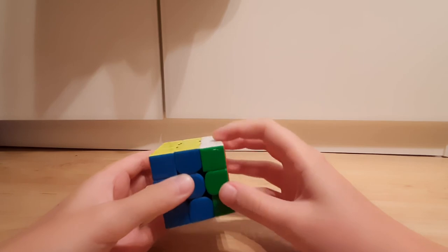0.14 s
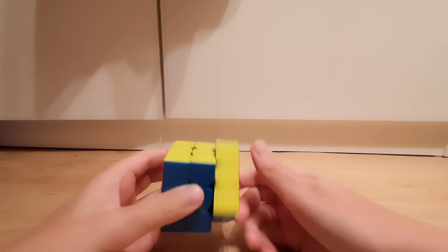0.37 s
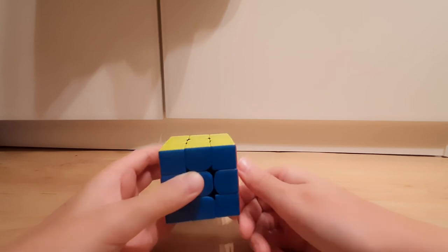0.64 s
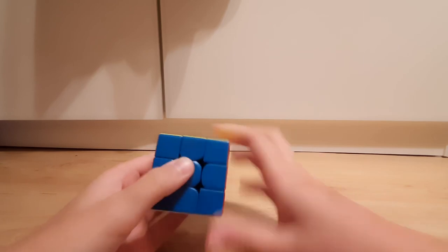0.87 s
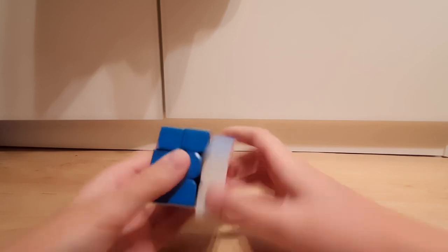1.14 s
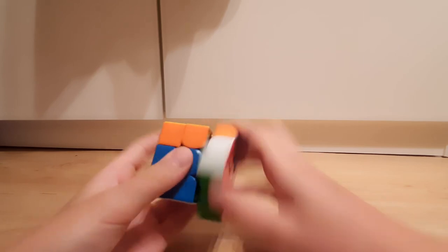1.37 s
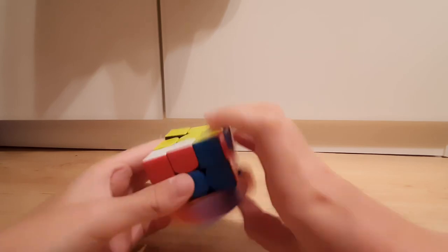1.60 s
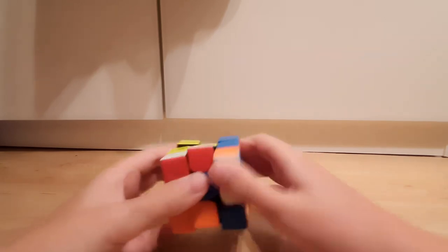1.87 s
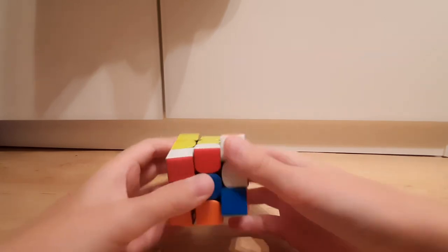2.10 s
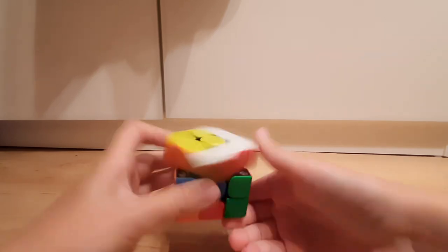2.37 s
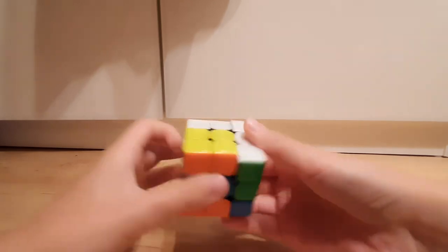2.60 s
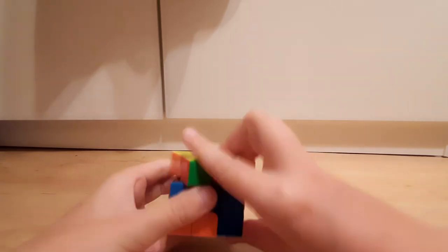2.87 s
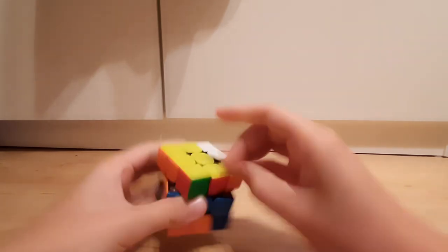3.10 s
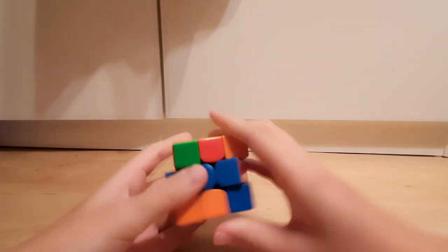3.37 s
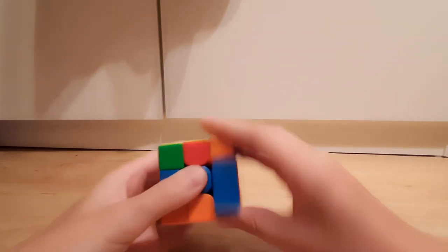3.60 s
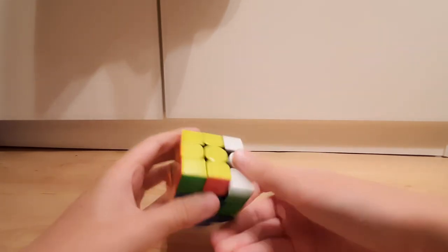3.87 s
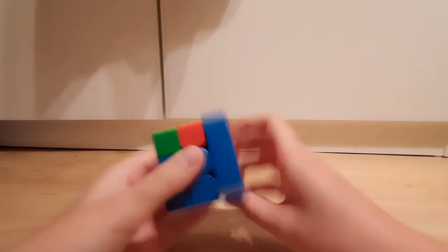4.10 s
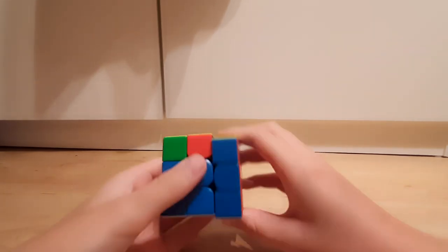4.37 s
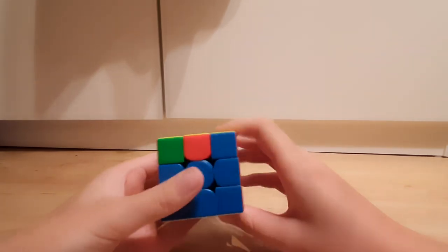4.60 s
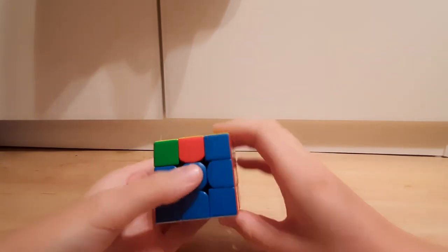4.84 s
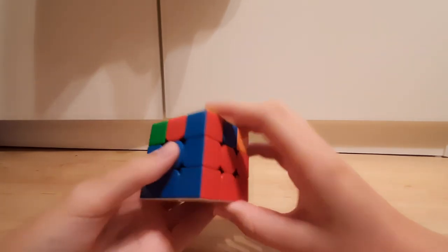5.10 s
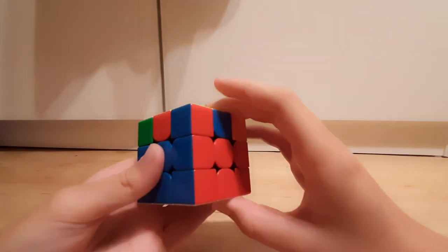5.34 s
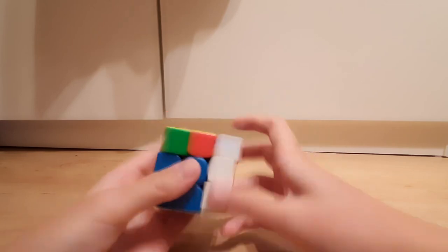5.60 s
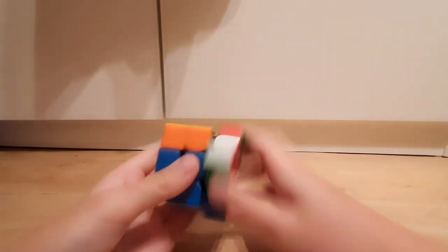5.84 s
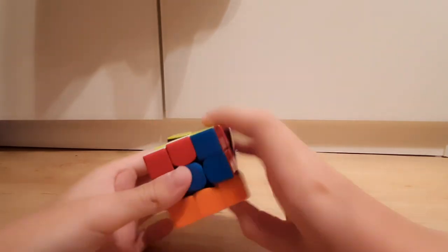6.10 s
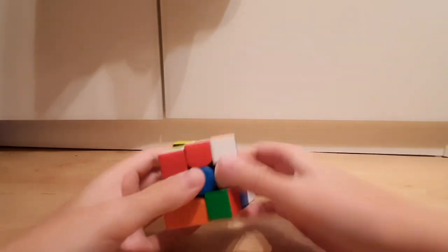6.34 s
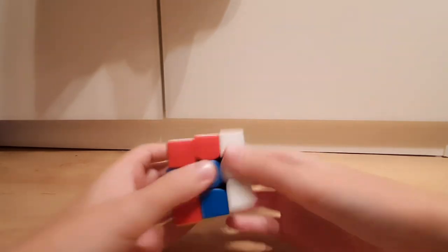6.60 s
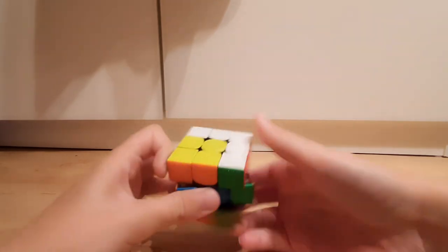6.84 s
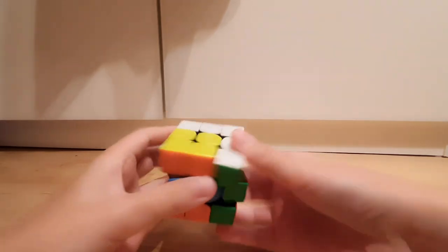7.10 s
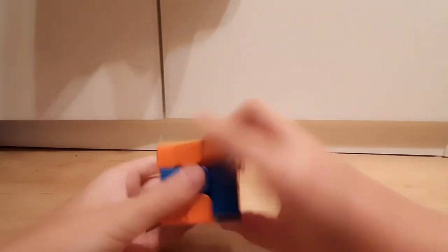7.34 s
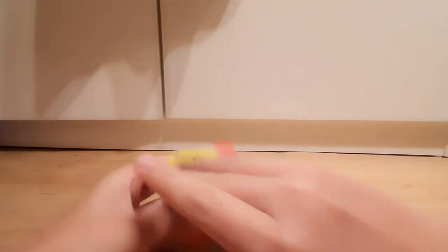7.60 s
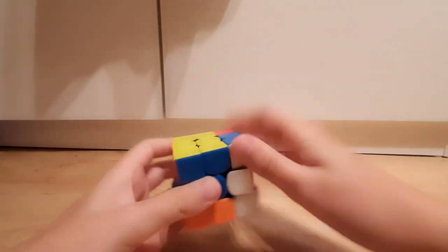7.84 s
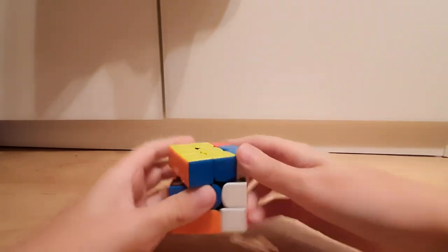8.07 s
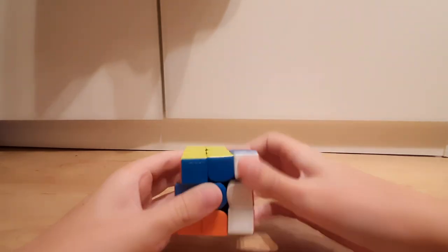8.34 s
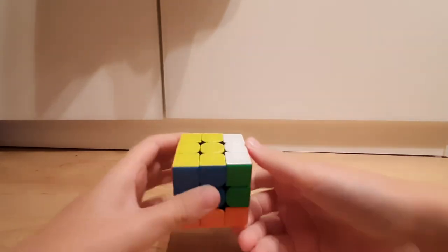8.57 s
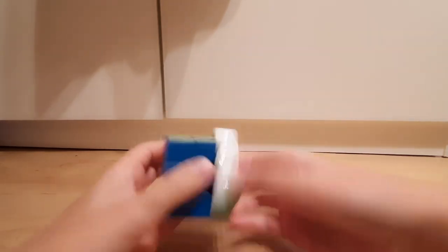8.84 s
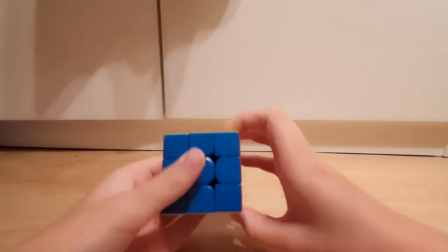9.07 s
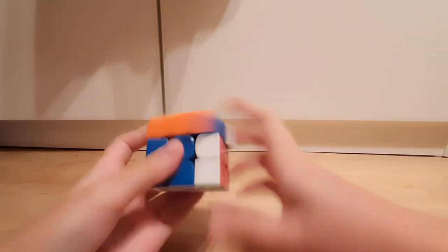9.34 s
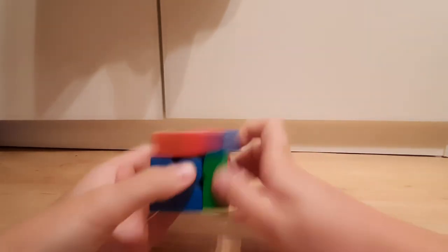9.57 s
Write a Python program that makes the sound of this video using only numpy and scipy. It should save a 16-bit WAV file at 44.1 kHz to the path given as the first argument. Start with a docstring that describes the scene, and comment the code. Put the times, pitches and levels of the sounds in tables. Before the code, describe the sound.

A small quiet room, miked closely in stereo, with soft hush, low traffic murmur and a faint engine droning through the walls, its pitch rising over the first four seconds. From 0 to 1 s a plastic puzzle cube gives small, soft clicks and a light slide. Around 1.1 s sharp snaps start, and from 1.4 to 3.1 s layers turn in rapid clattering bursts, bright and cracking with short hollow knocks and dry scraping. From 3.2 to 4.2 s the clicks are lighter, with a sharper snap at 3.9. From 4.3 to 5.5 s almost nothing but tiny ticks, while the engine returns, lower and falling. At 5.6 s the turning resumes, loudest around 6.1 s, rattling on until 7.8. Quieter clicks follow, a crisp snap at 8.4, gentle turns near 8.9, a brief lull, then hard quick turns at 9.3 and 9.6. Soft low bumps accompany the handling.

```python
"""Room hush, a murmur of traffic and a distant engine droning through the walls come first. At once
a plastic puzzle cube is turned by hand close to a pair of microphones in a small quiet room.
Bursts of tiny impacts snap and rattle its pieces, and dense ticks scrape its layers round.
The hands shake the table with low noise and bump it with short low cycles.
The engine is sines on a gliding firing tone; hush and traffic are coloured noise."""
import sys
import numpy as np
from scipy import signal
from scipy.fft import rfft, irfft
from scipy.io import wavfile
from scipy.ndimage import uniform_filter1d

SR = 44100
rng = np.random.default_rng(int(sys.argv[2]) if len(sys.argv) > 2 else 0)


def transcribe(u):
    """Save the signal u as a 16-bit wav file named by the first command-line argument.

    u: samples, shape (n,) or (channels, n), limited to [-1, 1]; the rate is SR.
    q: integer samples, one column per channel.
    """
    v = np.clip(np.atleast_2d(u).T, -1, 1)
    q = np.round(v * 32767).astype(np.int16)
    wavfile.write(sys.argv[1], SR, q)


def gain_from_db(level_db):
    """Turn a decibel level (scalar or array-like) into a linear amplitude factor."""
    decades = np.asarray(level_db, float) / 20
    return 10 ** decades


N = 427769

SIZE = 4096  # samples of one snap or filter response
APART = .62  # share of the crack that each microphone hears from another face of the cube


def evened(x):
    """Scales to rms 1."""
    return x / np.sqrt(np.mean(x ** 2) + 1e-20)


def read(points, hz):
    """Reads a spectrum on a log-frequency axis."""
    f, value = np.transpose(points)
    return np.interp(np.log(hz + 1), np.log(f + 1), value)


def add(mix, s, sound):
    """Mixes a sound in at s seconds."""
    part = mix[..., round(s * SR):][..., :sound.shape[-1]]
    part += sound[..., :part.shape[-1]]


def causal(db):
    """Minimum-phase spectrum from dB gains on the half circle."""
    log = np.log(gain_from_db(np.concatenate([db, db[..., -2:0:-1]], -1)))
    return np.exp(np.conj(signal.hilbert(log)))[..., :db.shape[-1]]


def noise(points, channels):
    """Steady noise of a given colour, rms 1."""
    z = rfft(rng.standard_normal((channels, N)))
    colour = gain_from_db(read(points, np.fft.rfftfreq(N, 1 / SR)))
    return evened(irfft(z * colour, N))


def background():
    """Steady hush, and a traffic rumble that both microphones share for the most part."""
    # colour of room tone and microphone hiss [f/Hz, relative level per Hz/dB]
    hush_colour = [(18, -58), (30, -8.5), (112, -5), (298, -16), (533, -16.5), (2000, -20), (2600, -23.5),
                   (7470, -25.5), (8530, -43.5), (11000, -22), (15500, -14), (16500, -38.5)]
    hush_db = -77.5
    # low murmur of traffic: the part shared by both microphones [t/s, level/dB]
    traffic_murmur = [(0, -78), (1.499, -79), (3, -64), (4.201, -77.5), (4.699, -83), (5.198, -72),
                      (6.5, -64.5), (8, -88.5), (9.1, -75), (9.7, -66)]
    s, db = np.transpose(traffic_murmur)
    rumble_colour = [(25, -9.5), (60, -1.5), (130, 5.5), (250, -10), (350, -13.5), (700, -49.5)]
    left, right, both = noise(rumble_colour, channels=3)
    rumble = both + .45 * np.array([left, right])
    rumble_gain = gain_from_db(np.interp(np.arange(N) / SR, s, db))
    return gain_from_db(hush_db) * noise(hush_colour, channels=2) + rumble_gain * rumble


def engine():
    """A firing tone, its octave and two shaft orders follow the engine speed, each fluttering unevenly."""
    # one path of the firing tone for each time the engine pulls [t/s, f/Hz, level/dB]
    pulls = [
        [(0, 108.2, -70.5), (.6, 112.2, -70.5), (1.45, 124.7, -60.5), (1.85, 127.2, -58), (2, 127.9, -96)],
        [(2.2, 133.7, -93), (2.5, 138.8, -74.5), (3.3, 153.8, -71), (3.7, 161, -66.5), (4.1, 160.6, -67.5),
         (4.4, 166, -83)],
        [(4.9, 112.9, -86.5), (5.25, 118.5, -55), (5.5, 114.3, -60.5), (5.85, 110.4, -57), (6.02, 107, -68)],
        [(6, 95.2, -70), (6.12, 93.8, -57.5), (6.5, 90.6, -60.5), (6.9, 92.2, -56.5), (7.2, 84.5, -69.5)],
    ]
    # one row for each pull: tones at 5/8, 1, 7/5 and 2 times the firing tone, against its path
    # [level/dB, level/dB, level/dB, level/dB]
    order_levels = [(-9.5, 0, -19.5, -16.5), (3, 0.007, -6, -22.5), (-10, 0, -28, -13.5),
                    (-13, 0.0044, -9.5, -8.5)]
    out = np.zeros(N)
    for rows, orders_db in zip(pulls, order_levels):
        s, *columns = np.transpose(rows)
        t = np.arange(s[0], s[-1], 1 / SR)
        hz, pull_db = (np.interp(t, s, c) for c in columns)
        turns = np.cumsum(hz) / SR
        for order, db in zip((5 / 8, 1, 7 / 5, 2), orders_db):
            drift = uniform_filter1d(rng.standard_normal((2, len(t))), size=1500)
            level, phase = evened(uniform_filter1d(drift, size=1500))
            gain = np.sqrt(2) * gain_from_db(pull_db + db + 3.3 * level)
            add(out, s[0], gain * np.sin(2 * np.pi * order * turns + 0.43 * phase))
    return out


def ring(count, vary_db, detune):
    """Spectra of the body modes and of the crack, struck at another spot each time."""
    # hollow pieces ring briefly, before each strike varies them [f/Hz, level/dB, t60/s]
    body_modes = [(351, -3.5, 0.014), (600, -19.5, 0.0082), (825, -7, 0.02), (906, 2.5, 0.0096),
                  (1275, 3, 0.023), (1557, 2.5, 0.02), (1856, -2, 0.024), (2065, 0.5, 0.017)]
    # colour of the crack as the microphones hear it, before each strike varies it [f/Hz, level/dB]
    crack_colour = [(150, -52), (600, -18.5), (2200, -6.5), (3700, -4.5), (7500, 0), (8200, -7),
                    (8900, -17), (10200, -10.5), (11500, -8), (15600, -13.5), (16200, -57)]
    longest_s = .025  # upper limit on the t60 of the damped plastic
    t, hz = np.arange(SIZE) / SR, np.fft.rfftfreq(SIZE, 1 / SR)
    f, db, t60 = (c[:, None] for c in np.transpose(body_modes))
    spot = rng.standard_normal((count, 2, len(body_modes), 1))
    fade_db = -60 * t / np.minimum(t60, longest_s)
    tones = np.sin(2 * np.pi * f * (1 + detune * spot[:, 1]) * t)
    modes = gain_from_db(db + vary_db * spot[:, 0] + fade_db) * tones
    # small pieces radiate no bass
    small = causal(read([(100, -33.5), (350, -22.5), (480, -19.5), (620, -8.0)], hz))
    lumps = uniform_filter1d(rng.standard_normal((count, len(hz))), size=250, axis=1)
    crack = causal(read(crack_colour, hz) + vary_db * evened(lumps))
    return rfft(modes.sum(1)) * small, crack


def peaked(x):
    """Scales each sound so that its loudest moment, smoothed over 70 samples, has amplitude 1."""
    power = uniform_filter1d((x ** 2).mean(1), size=70, axis=-1)
    return x / np.sqrt(2 * power.max(-1))[:, None, None]


def snaps():
    """Each snap is a rattle of tiny impacts that builds, peaks and dies; it cracks and rings the hollow pieces."""
    # pieces snapping into place, close up: moment the impacts peak, crack, hollow body against
    # crack, nominal half length ahead of the limits and unequal flanks
    # [t/s, level/dB, level/dB, half length/ms]
    snap_moments = [(0.0785, -46, -33, 0.75), (0.1329, -47, -30, 1.5), (0.1851, -38, -42, 2.1),
                    (0.2631, -41.5, -4, 6.2), (0.3223, -34.5, 1.5, 2.1), (0.3418, -35, 3, 1.4),
                    (0.3653, -35.5, -3.5, 2.9), (0.3771, -29.5, -7, 1.4), (0.4236, -41, 1, 6.83),
                    (0.5129, -52, -1, 5.2), (0.7106, -40, -8.5, 1.8), (0.9241, -44.5, -34, 1.6),
                    (0.9662, -29.5, -31, 1.1), (1.01, -47, -24, 1.6), (1.0915, -38, -25, 2.68),
                    (1.1312, -27, -8.5, 2.3), (1.149, -25, -15, 1.4), (1.1876, -18.5, -12.5, 3.6),
                    (1.2012, -19, -15, 1.2), (1.3374, -38.5, -2.5, 1.8), (1.3811, -28.5, -1, 1.5),
                    (1.4242, -13.5, -7, 1.9), (1.4366, -26, -9.5, 1.8), (1.4829, -21, -3.5, 7.2),
                    (1.5057, -19.5, -6.5, 5.9), (1.542, -16.5, -6, 3.6), (1.5648, -15, -6.5, 6.6),
                    (1.5861, -23, -4, 4.0), (1.6305, -9, -8.5, 3.1), (1.6556, -14, -8.5, 5.0),
                    (1.7584, -27, -7.5, 3.3), (1.7674, -18, -7, 1.7), (1.7846, -19.5, -7.5, 16),
                    (1.7952, -22, -3.5, 13), (1.8901, -31.5, -24.5, 0.84), (1.9448, -26, -2, 6.1),
                    (2.0039, -15, -5.5, 2.8), (2.1656, -10.5, -10, 2.6), (2.1785, -19.5, -4.5, 4.3),
                    (2.198, -21.5, -24, 4.2), (2.2969, -26, -6.5, 6.2), (2.3831, -24.5, -5.5, 9.6),
                    (2.4037, -19.5, -4, 3.5), (2.4165, -14.5, -11.5, 3.6), (2.4742, -29.5, 0.5, 2.0),
                    (2.5251, -30.5, -0.5, 2.9), (2.6002, -37, -1.5, 0.84), (2.6634, -39, -3, 3.3),
                    (2.7284, -29, -15.5, 1.5), (2.7474, -30.5, -13.5, 6), (2.7743, -17.5, -11, 3),
                    (2.7917, -23, -1.5, 5.7), (2.8184, -29, -10, 8.4), (2.8422, -20, -3.5, 1.2),
                    (2.8611, -22, -7.5, 4.4), (2.9609, -27.5, -35.5, 1.2), (3.0159, -10, -14, 0.52),
                    (3.0852, -16.5, -4, 1.3), (3.0937, -14.5, -10, 1.2), (3.1524, -28.5, -4, 2.56),
                    (3.2164, -30.5, -24, 2.81), (3.2348, -34.5, 0, 3.1), (3.3219, -35.5, -25, 0.88),
                    (3.3895, -38.5, -9, 3.2), (3.5001, -40, -2.5, 1.2), (3.5235, -37.5, -16.5, 3.8),
                    (3.6447, -37.1, -6, 2), (3.6706, -33.5, -3.5, 7.7), (3.6954, -23, -4, 2.1),
                    (3.7103, -28.5, -2, 1.4), (3.7257, -27.5, -23, 2.3), (3.8067, -37, 0, 3.8),
                    (3.8541, -28.5, -1, 1.7), (3.8836, -33, 4, 0.78), (3.8999, -25, -4, 1.5),
                    (3.9138, -14.5, -16.5, 1.6), (3.9998, -33.5, -3.5, 1.6), (4.0696, -31.5, -8.5, 2.1),
                    (4.1563, -30, -2.5, 2.7), (4.2774, -45.5, -13.5, 1.9), (4.3753, -58, -19, 1.4),
                    (4.4076, -52, -13, 2.6), (4.5124, -60.5, -24, 2.5), (4.8275, -61.5, -10, 2),
                    (4.9522, -48.5, -1, 0.33), (5.049, -62.5, -7.5, 1.5), (5.1502, -59.5, -17, 2.0),
                    (5.2334, -53, -28, 1), (5.2726, -47, -41, 0.68), (5.4355, -67.5, -3, 3.5),
                    (5.5618, -36.5, -5, 3.7), (5.5892, -25.5, -10, 1.5), (5.643, -18.5, -8.5, 6.3),
                    (5.661, -19.5, -10, 0.51), (5.7373, -28, -3.5, 1.6), (5.7803, -33, 0.5, 0.61),
                    (5.8326, -25, -5, 2.4), (5.8809, -16, -7, 5.2), (5.9539, -26.5, -42, 3.6),
                    (5.9746, -19, -6.5, 5.6), (6.0057, -18.5, -2, 3.7), (6.0231, -17.5, -7.5, 3.2),
                    (6.0435, -14.5, -6, 5.5), (6.0847, -11, -6.5, 3.4), (6.1118, -7.5, -9, 4.6),
                    (6.1439, -25, -5, 2.5), (6.1926, -22, -2, 6.5), (6.2042, -11, -16, 2.5),
                    (6.2243, -13, -8.5, 3.6), (6.3652, -37, -3.5, 2.67), (6.4384, -16, -7.5, 2.07),
                    (6.4878, -35.5, -5, 4.8), (6.5513, -28, -39, 0.53), (6.5759, -17, -13.5, 2.6),
                    (6.7005, -10, -15, 1.3), (6.7393, -24, -1, 5.6), (6.7529, -14, -8, 1.8),
                    (6.7739, -27, -5, 3.7), (6.8328, -29, -2, 0.93), (6.8497, -30, 2.5, 2.8),
                    (6.9791, -29.5, -12, 1.7), (7.0885, -25, -9.5, 1.1), (7.1421, -39, -4.5, 2.4),
                    (7.2433, -24.5, -8, 3.4), (7.2652, -21.5, -6, 1.8), (7.3094, -12.5, -28, 1.5),
                    (7.3257, -21, -7, 1.1), (7.3676, -21, -0.5, 3), (7.4607, -27, -6.5, 5.9),
                    (7.567, -21.5, -6, 8.3), (7.6217, -15.5, -4.5, 9), (7.6489, -25.5, -11.5, 2.4),
                    (7.7117, -40, 1.5, 4), (7.7371, -25, -8, 1.3), (7.7941, -23.5, -8.5, 0.72),
                    (7.8817, -32, -6.5, 4.1), (7.9305, -37, 0, 2.3), (7.9592, -32, -11.5, 2.2),
                    (8.0062, -38, -16, 3.1), (8.0465, -37, -4.5, 1.62), (8.064, -35, -4.5, 6.8),
                    (8.1144, -49, 0.5, 3), (8.3419, -39, -45, 0.37), (8.3783, -27.5, -3, 7.7),
                    (8.3873, -14, -15, 0.82), (8.4066, -14, -8.5, 1.3), (8.4312, -30, -1, 4.2),
                    (8.5108, -37, -3, 0.81), (8.6374, -35, -11, 1.6), (8.6988, -33, -3, 3),
                    (8.8139, -35.5, -7.5, 4.6), (8.8597, -23, -43, 1.9), (8.8717, -26, -4, 1.9),
                    (8.9002, -30, -4.5, 3.5), (8.9369, -30.5, -8, 2), (9.0388, -48.5, -10.5, 2.3),
                    (9.2451, -27, -5.5, 2.44), (9.2914, -30.5, -6.5, 7.3), (9.3094, -19, -20.5, 0.6),
                    (9.3283, -15.5, -11.5, 0.36), (9.3359, -13, -9.5, 4.8), (9.4817, -34, -7.5, 3.1),
                    (9.5142, -28.5, -14, 4.5), (9.5839, -14, -14, 3.4), (9.5973, -20, -13.5, 2.9),
                    (9.6347, -15.5, -25, 2.6), (9.665, -24.5, -24, 1.78)]
    s, db, body_db, ms = np.transpose(snap_moments)
    lead = 500  # samples of build-up kept ahead of the peak
    t = (np.arange(SIZE) - lead) / SR
    draw = rng.random((len(s), 2, 3, SIZE))
    half = np.clip(ms, .2, 15)[:, None, None] / 1000
    shape = np.exp(-abs(t / np.where(t < 0, 0.67 * half, 0.83 * half)) ** 0.74)
    hits = draw[:, 0] < 7000 / SR  # 7000 impacts a second
    strengths = np.tan(2.1 * (draw[:, 1] - .5))  # mostly weak, a few strong
    impacts = hits * strengths * shape
    shared, own = rfft(impacts[:, :1]), rfft(impacts[:, 1:])
    body, crack = ring(count=len(s), vary_db=5.0, detune=0.037)
    bright = irfft(((1 - APART) * shared + APART * own) * crack[:, None])
    hollow = irfft(shared * body[:, None])
    sound = peaked(bright) + gain_from_db(body_db)[:, None, None] * peaked(hollow)
    out = np.zeros((2, N + lead))
    for k in range(len(s)):
        add(out, s[k], gain_from_db(db[k]) * sound[k])
    return out[:, lead:]


def turning_db():
    """Every turn builds up and dies away around its hardest moment; their powers add."""
    # layers turned round: hardest scrape, then the time for a change of 20 dB on either side
    # [t/s, level/dB, build-up/ms, die-away/ms]
    layer_turns = [(.091, -69, 21, 170), (.335, -49.5, 164, 153), (.715, -62, 12, 110),
                   (.925, -72.5, 14, 250), (1.195, -34, 71, 41), (1.425, -36, 122, 290),
                   (1.545, -34.5, 160, 140), (1.642, -28.5, 57, 87), (1.788, -31, 97, 62),
                   (1.935, -45, 100, 290), (2.02, -35.5, 55, 27), (2.18, -33, 68, 54), (2.4, -36, 125, 110),
                   (2.52, -50, 150, 260), (2.84, -32.5, 110, 57), (2.98, -48, 39, 330),
                   (3.09, -38, 207, 130), (3.22, -45.5, 180, 33), (3.33, -55.5, 11, 150),
                   (3.5, -58.5, 190, 99), (3.62, -46.5, 68, 560), (3.7, -46, 120, 160), (3.92, -36, 77, 77),
                   (4.14, -51, 170, 88), (4.25, -63.5, 100, 310), (5.59, -43, 20, 184),
                   (5.65, -45, 87, 150), (5.88, -37, 95, 130), (6.03, -38, 330, 300), (6.1, -35, 130, 250),
                   (6.219, -28, 81, 68), (6.44, -42, 73, 110), (6.59, -37, 32, 96), (6.761, -36.5, 150, 65),
                   (6.9, -48, 440, 220), (7.119, -47, 86, 100), (7.31, -34.5, 86, 144),
                   (7.632, -33, 156, 61), (7.8, -53.5, 530, 470), (8.09, -52.5, 39, 370),
                   (8.409, -42.5, 87, 133), (8.712, -44.5, 69, 92), (8.889, -39.5, 97, 77),
                   (9.342, -31, 93, 70), (9.521, -37.5, 78, 100), (9.61, -26.5, 21, 87)]
    rest_db = -94  # fingers resting on the cube between turns
    curved = 1.64  # above 1 a turn has a rounder top and steeper ends
    t = np.arange(0, N, 64) / SR
    s, db, build_ms, die_ms = (c[:, None] for c in np.transpose(layer_turns))
    away_ms = 1000 * (t - s)
    each = db - 20 * (abs(away_ms) / np.where(away_ms < 0, build_ms, die_ms)) ** curved
    power = (gain_from_db(each) ** 2).sum(0) + gain_from_db(rest_db) ** 2
    return np.interp(np.arange(N) / SR, t, 10 * np.log10(power))


def scrape(db):
    """Dense small ticks in uneven clumps while a layer slides over its neighbours."""
    # hollow body against a -40 dB scrape; harder turns sound brighter
    hollow_db, hollow_per_db = -5.5, -0.17
    clumps = gain_from_db(6.5 * evened(uniform_filter1d(rng.standard_normal(N), size=110)))
    strength = gain_from_db(4 * np.minimum(rng.exponential(1, (3, N)), 4))
    signed = strength * rng.choice([-1, 1], (3, N))
    ticks = clumps * signed * (rng.random((3, N)) < 3500 / SR)  # 3500 ticks a second
    spot = rng.integers(0, 12, N)  # each tick strikes one of 12 spots
    body, crack = (irfft(z)[:, None, :SIZE // 2] for z in ring(count=12, vary_db=8.5, detune=0.09))

    def struck(source, responses):
        """Each spot answers its own ticks with its own response."""
        return sum(signal.oaconvolve(source * (spot == k), h, axes=1)[:, :N]
                   for k, h in enumerate(responses))

    faces = (1 - APART) * ticks[:1] + APART * ticks[1:]
    bright = struck(faces, crack)
    hollow = struck(ticks[:1], body)
    over_db = np.maximum(db + 40, -25)
    hollow_gain = gain_from_db(hollow_db + hollow_per_db * over_db)
    return gain_from_db(db) * (evened(bright) + hollow_gain * evened(hollow))


def room(x):
    """A dense tail of reflections, each band dying at its own speed."""
    # decay of the small room [f/Hz, t60/s]
    room_decay = [(300, .3), (1000, 0.05), (4000, 0.25), (14000, 0.021)]
    taps = rng.standard_normal((2, SR // 2)) * (np.arange(SR // 2) > 90)  # reflections start after 2 ms
    hz, t, z = signal.stft(taps, SR, nperseg=128)
    fade = gain_from_db(-60 * t / read(room_decay, hz)[:, None])
    tail = signal.istft(z * fade, SR, nperseg=128)[1]
    return signal.oaconvolve(x, tail / np.linalg.norm(tail, axis=1, keepdims=True), axes=1)[:, :N]


def shake(db):
    """The turning hands shake the table: low noise that follows the scraping."""
    table_colour = [(25, -11), (70, 7.5), (200, -7.5), (350, -8), (500, -43.0)]
    left, right, both = noise(table_colour, channels=3)
    return gain_from_db(0.67 * db - 37.5) * (both + .5 * np.array([left, right]))


def bumps():
    """Each bump is a few soft low cycles that swell and die."""
    # hands bumping as they regrip, level ahead of the swell [t/s, level/dB, f/Hz]
    regrips = [(0.399, -58, 79.5), (1.699, -60, 78.1), (2.837, -48, 111), (3.199, -47.5, 59.66),
               (3.917, -54.5, 63.6), (5.748, -47, 108.5), (6.199, -50, 66), (6.8, -64, 107),
               (7.351, -64, 71), (7.622, -43, 91), (7.919, -60.5, 85), (8.44, -51, 80.4),
               (9.349, -55, 54.3)]
    out, t = np.zeros(N), np.arange(SR // 4) / SR
    swell = t / 0.007 * np.exp(1 - t / 0.0082)
    for s, db, hz in regrips:
        add(out, s, gain_from_db(db) * swell * np.sin(2 * np.pi * hz * t))
    return out


def scene():
    """The cube reaches the left microphone first, then the room answers."""
    lag_s = 0.00014  # the right microphone is a little farther from the cube
    turning = turning_db()
    cube = snaps() + scrape(turning)
    # fractional delays: half the lag early on the left, half late on the right
    shift = np.array([[-.5], [.5]]) * lag_s * SR
    late = np.sinc(np.arange(-48, 49) - shift) * np.hanning(97)
    direct = signal.oaconvolve(cube, late, "same", axes=1)
    # engine and bumps come from the left and reach the right microphone 30 samples later
    low = engine() + bumps()
    low = np.array([low, np.roll(low, 30)]) + shake(turning)
    nearer_left = gain_from_db([[.6], [-.6]])
    echo = gain_from_db(-16) * room(cube)
    return nearer_left * (direct + echo + low) + background()


def top_cut(x):
    """Nothing passes above the cut-off."""
    return signal.sosfilt(signal.butter(12, 17150, fs=SR, output="sos"), x)


def record(dry):
    """The microphone housing colours everything by its ring and dip."""
    # ring and dip of the microphone housing [f/Hz, level/dB]
    housing_colour = [(1900, 0), (2050, 5), (2130, 0), (2250, -5), (2500, 0)]
    housing = irfft(causal(read(housing_colour, np.fft.rfftfreq(SIZE, 1 / SR))))
    mix = signal.oaconvolve(dry, housing[None], axes=1)[:, :N]
    return top_cut(mix)


dry = scene()
out = record(dry)
transcribe(out)
```